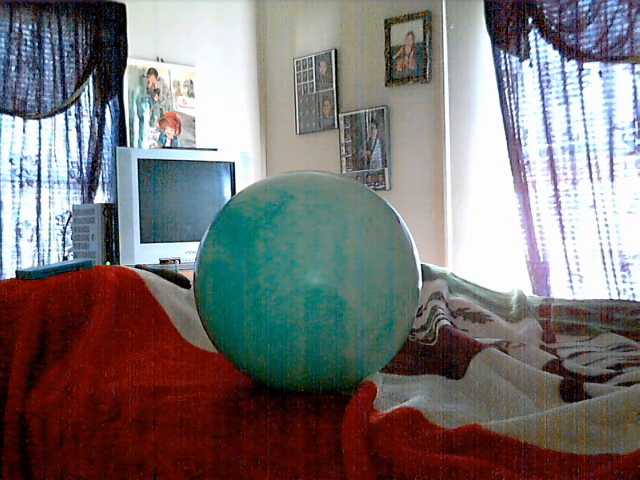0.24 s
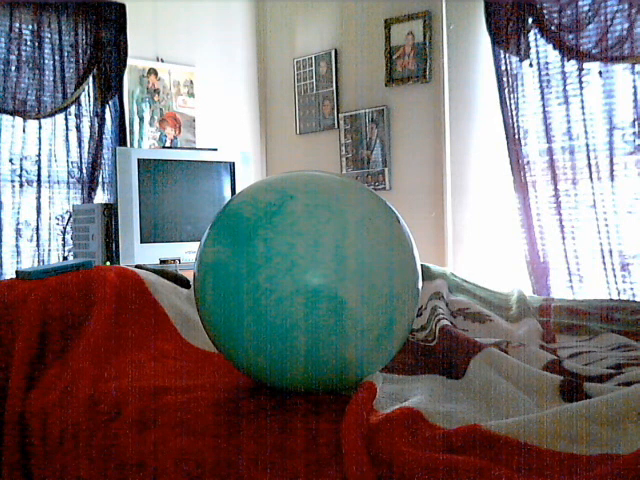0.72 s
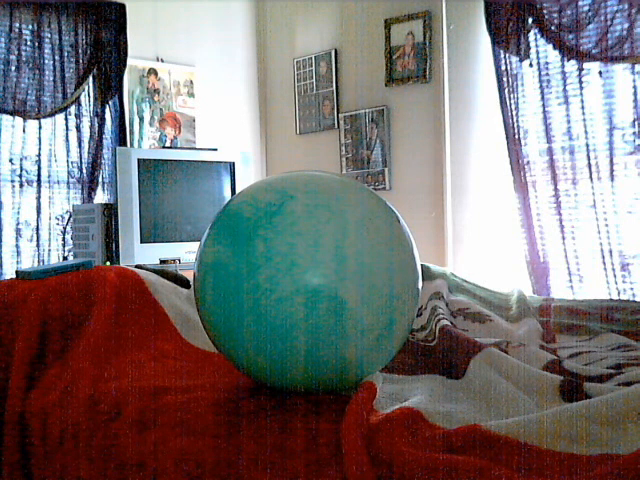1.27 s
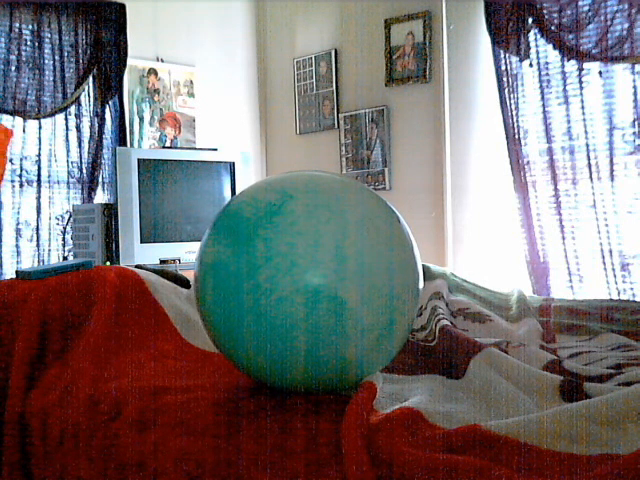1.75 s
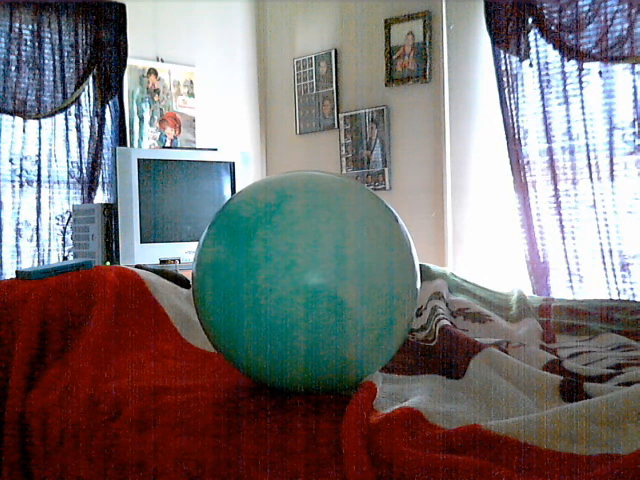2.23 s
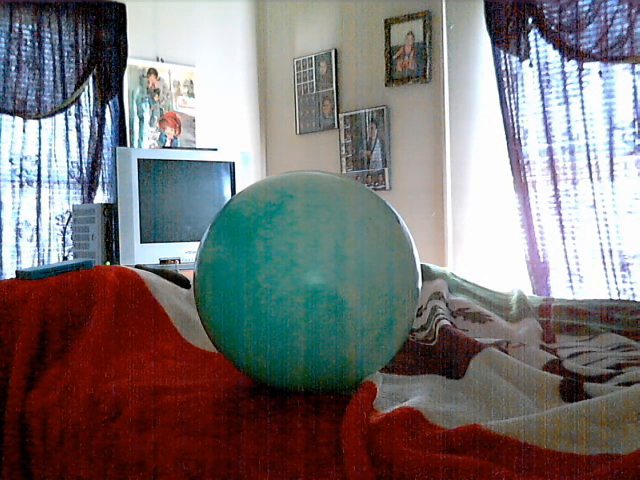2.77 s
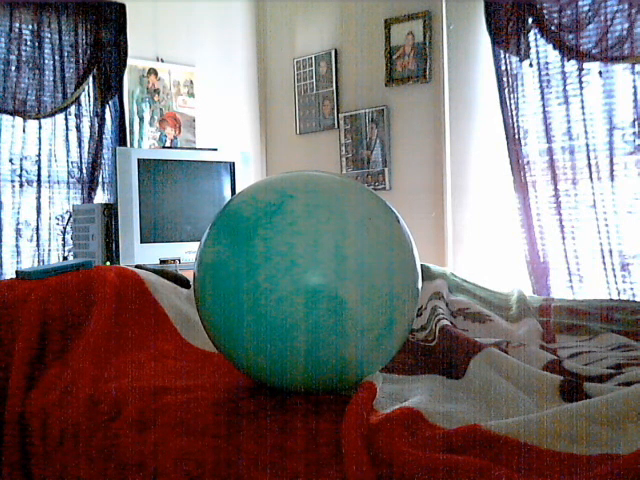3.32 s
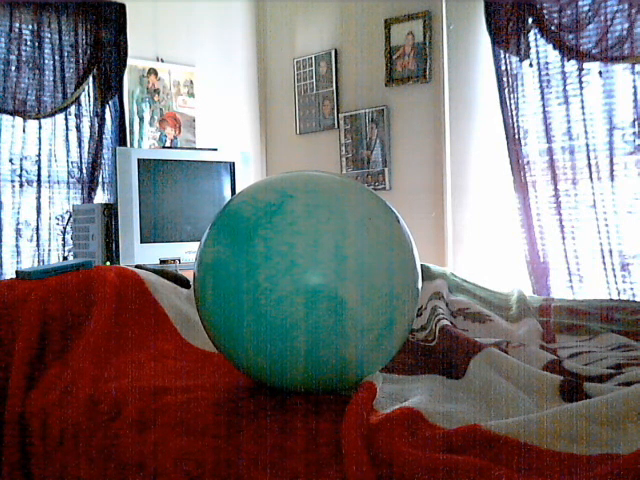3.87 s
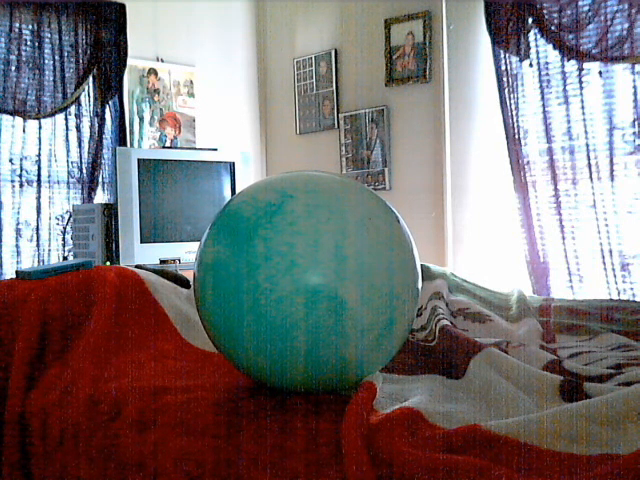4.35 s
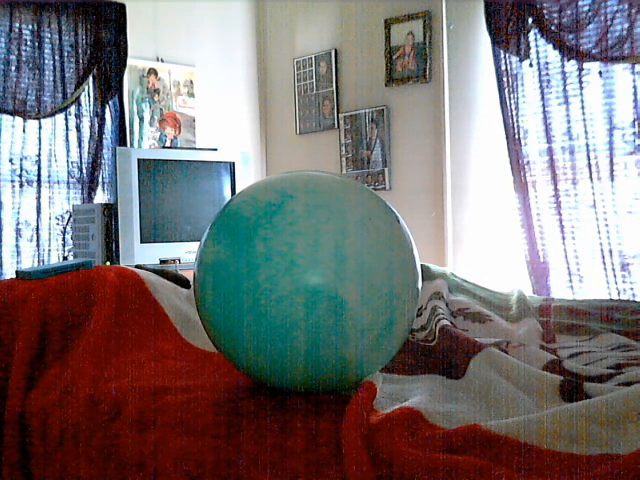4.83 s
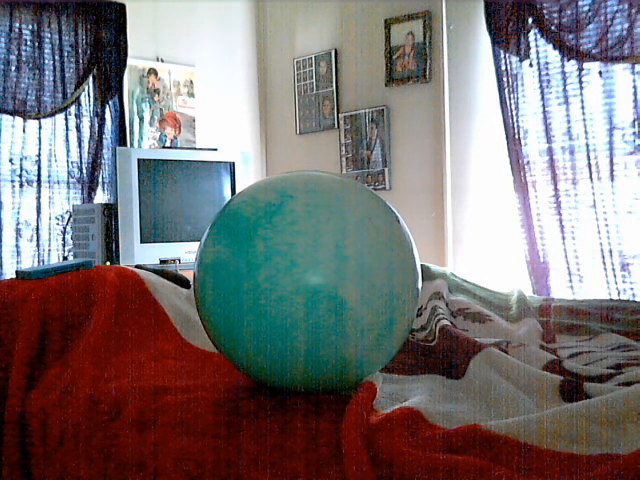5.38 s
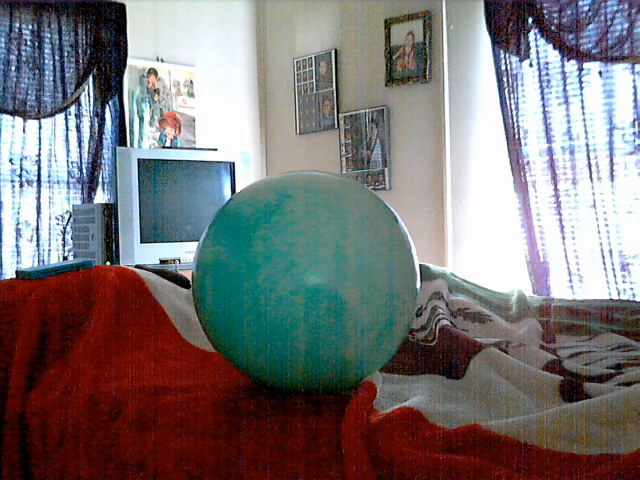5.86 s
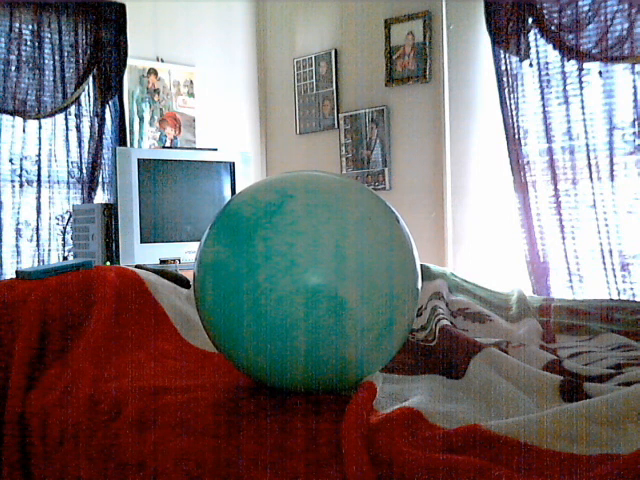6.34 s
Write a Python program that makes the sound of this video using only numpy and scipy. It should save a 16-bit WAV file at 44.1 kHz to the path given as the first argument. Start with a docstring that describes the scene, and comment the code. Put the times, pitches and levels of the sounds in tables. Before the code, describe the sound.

Close to a small microphone in a quiet bedroom, a toy blaster's slide rasps and clacks in its hollow plastic shell, ending on a hard catch. About a second later it fires with a sharp snap, a foam dart thumps a rubber ball, and the steel spring rings briefly. The priming and shot happen once more. Light handling taps and soft, dull thuds fall in between.

```python
"""A spring toy blaster is primed and fired twice in a bedroom, close to a small microphone.
Its slide rasps and clacks in the hollow plastic shell. At each shot the plunger slams, the steel
spring rings on, and the foam dart thumps a rubber ball. Light taps, dull thuds and a faint squeak
come in between. The microphone squashes loud hits and turns the quiet room noise down."""
import sys
import numpy as np
from scipy import signal
from scipy.fft import rfft, irfft, next_fast_len
from scipy.io import wavfile
from scipy.ndimage import uniform_filter1d, minimum_filter1d, map_coordinates

SR = 44100
rng = np.random.default_rng(int(sys.argv[2]) if len(sys.argv) > 2 else 0)


def dump(signal):
    """Clip the signal to [-1, 1] and save it as 16-bit WAV at the path in sys.argv[1]."""
    limited = np.clip(np.atleast_2d(signal).T, -1, 1)
    pcm = np.round(limited * 32767).astype(np.int16)
    wavfile.write(sys.argv[1], SR, pcm)


N = 291501

# The shell has five pitch bands, low to high: hollow, clack, edge, bright, sizzle. A knock or rub's
# level is that of its bright band; columns named for other bands are added to that level.
# Light taps of handling: t/s, level/dB, hollow/dB, clack/dB, edge/dB, note f/Hz
TAPS = [(0.076, -64.5, 25.5, 12, -9.5, 432), (.094, -52, 6, 5.5, -7, 482),
        (0.1199, -32.5, -14.5, -21, 1, 1515), (0.9127, -47.5, 14, 12, 4, 454),
        (1.0065, -57.5, -12.5, 10, 12.5, 919), (1.2398, -43.5, -18.5, -7.5, 4, 2682),
        (1.261, -38, -31.5, -6, 2, 3345), (1.3307, -32.5, -18.5, -4, 1, 2300),
        (1.3985, -46.5, 11.5, 11.5, 4, 459), (1.4194, -62.5, 20.5, 9, 16, 464.6),
        (1.6777, -66, 1, 27, 21, 1683), (2.1159, -33.5, 8, 0.5, -0.5, 1180),
        (2.6986, -68, -5, 9, 24.5, 3300), (3.2798, -59, 2.5, 8.5, 3.5, 829),
        (3.3121, -52, 3, -10, 8.5, 2520), (3.4234, -71, 3.5, 23, -2.5, 1002),
        (3.722, -44.5, 12, 5.5, 1.5, 432.2), (3.7624, -40, -4, -5, -11.5, 402.6),
        (3.8599, -61, 12.5, 7.5, 1, 418.7), (3.9805, -40.5, -8, 2, -6.5, 458.5),
        (4.7695, -63.5, 9, -1, 16, 511), (4.8933, -34, -22, -9, -19, 6360),
        (4.9279, -33, -24.5, -20.5, -3.5, 4423), (4.9783, -42.5, -28.5, -34, 1.5, 2307),
        (5.2585, -78.5, 24.5, 15.5, 1, 1553), (5.7548, -31, 8, 7.5, 6, 1832),
        (6.1475, -45, -12.5, 3, 10, 1723), (6.2994, -62.5, 11.5, -5.5, 6, 3634),
        (6.4525, -26.5, -4.5, -1, -1, 458)]
# Catches and stops of the slide: t/s, level/dB, hollow/dB, note f/Hz, level of the rasp after it/dB
SLIDE_CATCHES = [(.172, -16.5, -4.5, 1600, -25), (0.2013, -13.5, -6, 423.7, -29.5),
                 (0.27, -8.5, -20.5, 4228, -27), (0.3377, -11, -9.5, 6200, -30),
                 (.3721, -11.5, -18.5, 4490, -37), (0.482, -22.5, -16, 4420, -42),
                 (0.5179, -27.5, -13.5, 6100, -41.5), (0.5578, -30.5, -5.5, 484, -45.5),
                 (.5974, -16, -14.5, 1670, -24.5), (.6558, -21.5, -12.5, 1070, -34),
                 (0.6839, -9.5, -16.5, 6292, -26), (0.6949, -0.5, -13, 403.6, -27),
                 (3.9989, -29, -2, 497.5, -41.5), (4.0415, -16, -4.5, 431.6, -34.5),
                 (4.0776, -12.5, -8.5, 1623, -32.5), (4.1745, -8, -19, 5495, -28),
                 (4.2188, -8.5, -11, 2711, -29), (4.2448, -13, -22.5, 544.9, -35),
                 (4.3483, -25, -19, 3528, -41), (4.4065, -28, -10.5, 556.1, -49.5),
                 (4.4374, -16, -15, 1548, -25.5), (4.492, -20.5, -7.5, 424.8, -35.5),
                 (4.5091, -9.5, -17, 468.3, -34), (4.5206, -0.5, -10, 412.8, -31.5)]
# Plunger slams: t/s, spring level/dB, t/s at which the spring is damped
SHOTS = [(1.759, -37.5, 2.184), (5.438, -31.5, 5.94)]


def amp(db):
    """Turn decibels into a gain."""
    return 10 ** (np.asarray(db) / 20)


def curve_at(points, hz):
    """Read a curve of (f/Hz, value) points along a log frequency axis."""
    freqs, values = np.transpose(points)
    return np.interp(np.log(hz + 1), np.log(freqs + 1), values)


def wobble(rate):
    """A smooth random curve through `rate` points a second."""
    points = rng.standard_normal(int(N * rate / SR) + 4)
    return map_coordinates(points, [np.arange(N) * rate / SR])


def filtered(x, response):
    """Scale each frequency in x by response(hz)."""
    size = next_fast_len(N + SR // 2)
    return irfft(rfft(x, size) * response(np.fft.rfftfreq(size, 1 / SR)), size)[..., :N]


def resonate(x, peaks, low_hz, high_hz):
    """Pass x through resonances (f/Hz, width/Hz, level/dB); white noise keeps its power."""
    def response(f):
        gain = sum((-1) ** k * amp(db) * 1j * f * width / (hz * hz - f * f + 1j * f * width)
                   for k, (hz, width, db) in enumerate(peaks))
        gain *= (1j * f / (low_hz + 1j * f) * high_hz / (high_hz + 1j * f)) ** 2
        return gain / np.sqrt(np.mean(np.abs(gain) ** 2))
    return filtered(x, response)


def ring(modes, seconds, attack_s, scatter_db):
    """Fading tones (f/Hz, level/dB, t60/s); t60 is the time taken to fade by 60 dB."""
    t = np.arange(int(seconds * SR)) / SR
    tones = sum(amp(db + rng.normal(0, scatter_db) - 60 * t / t60) * np.sin(2 * np.pi * hz * t)
                for hz, db, t60 in modes)
    return tones * (1 - np.exp(-t / attack_s))


def add(track, start_s, sound):
    """Mix a sound into a track."""
    part = track[..., round(start_s * SR):][..., :sound.shape[-1]]
    part += sound[..., :part.shape[-1]]


def room_noise():
    """A quiet, steady hush whose bass wanders."""
    # Tone of the hush: f/Hz, relative level/dB
    spectrum = [(25, -23), (60, -7), (125, 0), (200, -0.5), (400, -6), (800, -12.5), (1600, -17),
                (3200, -25.5), (6300, -25.5), (8000, -34), (10500, -44), (16000, -50)]
    noise = filtered(rng.standard_normal(N), lambda hz: amp(curve_at(spectrum, hz)))
    noise /= np.sqrt(np.mean(noise ** 2))
    bass = filtered(noise, lambda hz: 1 / (1 + (hz / 350) ** 4))
    return amp(-66) * (noise - bass + bass * amp(1.9 * wobble(13)))


def rubs():
    """Friction on the shell: yields t/s, loudness shape, level/dB, hollow/dB, clack/dB, edge/dB."""
    # Strokes of slide and hand: start t/s, loudest t/s, end t/s, level/dB, hollow/dB, clack/dB
    strokes = [(0, 0.002, 0.049, -71.5, 13, 4.5), (.1, .168, 0.23, -47.5, 1.5, 2.5),
               (.4, .5, .62, -53, -1, -2), (.66, 0.711, .735, -17.5, -8, 0), (2.35, 2.548, 2.71, -77, 5, 2),
               (3.27, 3.343, 3.43, -62, -10.5, -4.5), (3.616, 3.709, 3.86, -58, -9.5, -9.5),
               (3.98, 4.071, 4.15, -34, 0, 0.5), (4.3, 4.41, 4.45, -46, -6, 0),
               (4.506, 4.533, 4.555, -15.5, -7.5, 1), (4.885, 4.909, 5.05, -57.5, -18, -7),
               (5.77, 5.88, 5.99, -62, -7.5, -19), (6.444, 6.445, 6.59, -56.5, 6, 3)]
    t = np.arange(SR // 4) / SR
    rasp = amp(-60 * t / .2215) * np.minimum(1, t / .0089)  # trails each catch of the slide
    for start, _, hollow_db, _, db in SLIDE_CATCHES:
        yield start, rasp, db, hollow_db + 6, 1.5, -1
    clatter = amp(-60 * t / .13) * np.minimum(1, t / .008)  # loose parts shake on after a tap
    for start, db, hollow_db, clack_db, edge_db, _ in TAPS:
        yield start, clatter, db - 14.5, hollow_db, clack_db, edge_db
    for start, loudest, end, db, hollow_db, clack_db in strokes:
        swell = np.interp(np.arange(start, end, 1 / SR), [start, loudest, end], [0, np.pi / 2, 0])
        yield start, np.sin(swell) ** 1.8, db, hollow_db, clack_db, clack_db - 2.5


def sizzle_db(db):
    """Quiet knocks and rubs sound duller; loud ones keep their top treble."""
    return -15 + .22 * (db + 15)


def knocks():
    """Slide, plunger and taps hit the shell: yields t/s, level/dB, bands/dB, f/Hz, note/dB, t60/s."""
    # The plunger's release, slam and rebound: t/s from the slam, level/dB, hollow/dB, note f/Hz
    plunger = [(-.0058, -10, -4, 5702), (0, 0.5, -6, 425.7), (0.0142, -5, 4, 385)]
    slide_clack_db, plunger_clack_db = 2.5, 6  # the plunger cracks harder
    hits = [(*catch[:4], slide_clack_db) for catch in SLIDE_CATCHES]
    hits += [(slam + delay, *rest, plunger_clack_db) for slam, _, _ in SHOTS for delay, *rest in plunger]
    for start, db, hollow_db, hz, clack_db in hits:
        yield start, db, [hollow_db, clack_db + .45 * hollow_db, -4, 0, sizzle_db(db)], hz, -9, .03157
    for start, db, hollow_db, clack_db, edge_db, hz in TAPS:
        yield start, db, [hollow_db, clack_db, edge_db, 0, sizzle_db(db) - 19], hz, -4, .032


def shell():
    """Knocks and rubs shake the plastic shell; each knock also sounds the note of the part it hits."""
    # The shell's resonances, band by band: f/Hz, width/Hz, level/dB
    hollow = [(200, 130, -20.5), (302, 27, -15), (403.2, 61, 1), (504.2, 140, -1.5)]
    clack = [(633.3, 190, -4.5), (805.6, 410, 1), (1238.8, 990, -1), (1573, 540, -0.5)]
    edge = [(1956, 140, -4.3), (2479, 370, -0.82), (2771, 220, 1), (3450, 440, -1.6)]
    bright = [(4315, 640, 1.5), (5448, 380, 3.5), (5996, 490, 4.5), (6951, 1000, -0.5)]
    sizzle = [(7520, 1300, 2.5), (10540, 3000, -7.5)]
    bands = [(hollow, 190, 890), (clack, 400, 8700), (edge, 1100, 5700),
             (bright, 2400, 7200), (sizzle, 5000, 8100)]  # resonances, low f/Hz, high f/Hz
    forces, notes = np.zeros((5, N)), np.zeros(N)
    t = np.arange(SR // 12) / SR
    for start, db, colour_db, hz, note_db, t60 in knocks():
        attack_s = .0019 * max(1, -db / 24)  # soft contacts start more gently
        shape = amp(-60 * t / t60) * (1 - np.exp(-t / attack_s))
        bands_db = db + np.array(colour_db)
        add(forces, start, amp(bands_db)[:, None] * shape * rng.standard_normal((5, len(t))))
        note_t60 = .02 + 18 / hz  # high notes die sooner
        pair = [(hz, 0, note_t60), (hz * 1.06, -3, .47 * note_t60)]
        add(notes, start, amp(bands_db.max() + note_db) * ring(pair, .2, attack_s=.0016, scatter_db=2.5))
    grit = amp(1.2 * wobble(150) + 1.8 * wobble(30))  # friction catches and slips
    for start, shape, db, *colour_db in rubs():
        bands_db = db + np.array([*colour_db, 0, sizzle_db(db + 4.5)])
        samples = round(start * SR) + np.arange(len(shape))
        rub = amp(bands_db)[:, None] * shape * grit.take(samples, mode="clip")
        add(forces, start, rub * rng.standard_normal(rub.shape))
    return notes + sum(resonate(force, *band) for force, band in zip(forces, bands))


def low_swells():
    """Brief low swells of room rumble and a few soft, dull thuds."""
    # Swells and thuds: t/s, level/dB, f/Hz
    swells = [(1.641, -56, 156), (2.599, -57.5, 289.7), (2.897, -48.5, 189.7), (2.926, -49.5, 188.1),
              (2.956, -51, 188.3), (3.104, -52, 144.6), (3.357, -53, 127.6), (3.585, -50.5, 137),
              (3.791, -50.5, 139.3), (4.708, -53, 164.8), (5.225, -56.5, 140), (5.826, -37, 188.2),
              (5.898, -47, 193), (6.01, -42.5, 132.4), (6.064, -49.5, 146.7), (6.109, -47, 122),
              (6.168, -55, 176), (6.243, -52, 135), (6.408, -49.5, 148), (6.548, -42.5, 143.3)]
    out = np.zeros(N)
    for start, db, hz in swells:
        modes = [(hz, 0, .07), (hz * 2, -9, .06), (hz * .51, -9, .07)]
        add(out, start, amp(db + 6) * ring(modes, .2, attack_s=.0055, scatter_db=2.5))
    return out


def spring():
    """The steel spring sings after each slam until it is damped; its many coils add a weaker shimmer."""
    # The spring's main tones: f/Hz, level/dB, t60/s
    steel_tones = [(2143, -6, .25), (2590, -9.5, .25), (3100, -15, 0.67), (3253, -7, 1.1),
                   (3350.8, -8.5, 0.34), (3480, -12.5, .7), (3480, -14.5, .4), (3650, -17.5, 0.71),
                   (3970, -16.5, .8), (4525, -8.5, 0.9), (4780, -13.5, .7), (4930, -11.5, .6),
                   (5028, -15.5, .7), (5230, -16.5, .8), (5437, -16.5, .8), (5580, -12.5, 1),
                   (5700, -8.5, 0.51), (5933, -6, .6), (6107, -8.5, .6), (6460, -13.5, .6),
                   (6260, -10, 0.46), (6600, -13, 0.5), (6864, -16.5, .55), (7075, -18, .6),
                   (7175, -18.5, 0.65), (7542, -24, .5)]
    out = np.zeros(N)
    shimmer = [(3000 + 5200 * pitch, -13 - 70 * (pitch - .5) ** 2, .48 + .35 * length)
               for pitch, length in rng.uniform(size=(70, 2))]
    for start, db, damped_at in SHOTS:
        song = ring(steel_tones + shimmer, 1, attack_s=.004, scatter_db=.5)
        since_damped = np.maximum(np.arange(len(song)) / SR + start - damped_at, 0)
        add(out, start, amp(db - 56 * since_damped) * song)
    return out * amp(3.2 * wobble(76))  # the coils buzz against their guide


def ball():
    """The foam dart hits the rubber ball, whose air and skin boom."""
    # Hits on the ball: t/s, level/dB, boost of the deep tones/dB
    thumps = [(1.784, 2, -0.5), (5.467, -0.5, 1.5), (2.113, -33.5, 17)]
    # The ball's tones: f/Hz, level/dB, t60/s
    ball_tones = [(157, -15, 0.19), (232.9, -9, 0.12), (376.2, -2, .11), (466.8, 0, 0.06),
                  (653.5, -8.5, 0.066)]
    out = np.zeros(N)
    for start, db, deep_db in thumps:
        modes = [(hz, level + deep_db * (hz < 300), t60) for hz, level, t60 in ball_tones]
        add(out, start, amp(db) * ring(modes, .5, attack_s=.0015, scatter_db=0))
    return out * amp(.68 * wobble(60))  # the ball rocks on the bedding


def squeak():
    """A faint rub with a pitch: a narrow band of noise swells and fades."""
    # The rub: start t/s, end t/s, f/Hz, width/Hz, level/dB
    pitched_rub = (2.375, 2.52, 2480, 170, -66)
    start, end, hz, width_hz, db = pitched_rub
    t = np.arange(N) / SR
    shape = np.clip(np.minimum(t - start, end - t) / .014, 0, 1)
    friction = shape * amp(1.3 * wobble(40.1)) * rng.standard_normal(N)
    return amp(db) * resonate(friction, [(hz, width_hz, 0)], low_hz=1500, high_hz=3500)


def room_echo(x, piece_s=.2):
    """Walls and furniture answer; the blaster moves, so each short piece of sound gets a new echo."""
    # How long the echo lasts: f/Hz, t60/s
    fade_times = [(150, 0.36), (700, 0.3), (5000, 0.28), (8500, 0.29), (12000, 0.14)]
    out, step = np.zeros(N), int(piece_s * SR)
    for first in range(0, N, step):
        hz, t, noise = signal.stft(rng.standard_normal(SR // 2), SR, nperseg=256)
        fade = amp(-60 * t / curve_at(fade_times, hz)[:, None])
        _, tail = signal.istft(noise * fade, SR, nperseg=256)
        add(out, first / SR + .003, signal.fftconvolve(x[first:first + step], tail / np.linalg.norm(tail)))
    return out


def scene():
    """The blaster, ball and low swells with their echo and the room's hush, in one channel."""
    blaster = shell() + spring() + squeak()
    boom, swells = ball(), low_swells()
    echo = room_echo(amp(-6.5) * blaster + amp(-7) * boom + amp(-10) * swells)
    return (blaster + boom + swells + echo + room_noise())[None]


def noise_gate(x, gate_db, depth_db, knee_db):
    """Turn quiet stretches down; the gate opens quickly for a loud sound and stays open briefly."""
    level_db = 10 * np.log10(np.abs(uniform_filter1d(x ** 2, size=441)) + 1e-12)
    held_db = -minimum_filter1d(-level_db, size=661, origin=220)
    shut = 1 / (1 + np.exp((held_db - gate_db) / knee_db))
    return x * amp(-depth_db * uniform_filter1d(shut, size=441))


def record(dry):
    """Peaks are squashed, quiet stretches turned down, the deepest bass and highest treble cut away."""
    ceiling, hardness = .68, 6.5
    squashed = dry[0] / (1 + np.abs(dry[0] / ceiling) ** hardness) ** (1 / hardness)
    bass = filtered(squashed, lambda hz: 1 / (1 + (hz / 320) ** 6))
    gated = noise_gate(bass, gate_db=-64, depth_db=5.5, knee_db=1.5)
    gated += noise_gate(squashed - bass, gate_db=-58.5, depth_db=6.5, knee_db=3.5)

    def response(hz):
        dull_top = amp(-20 / (1 + np.exp((12800 - hz) / 80))) * (hz < 16300)
        bass_cut = hz ** 3 / (85 ** 3 + hz ** 3)
        return dull_top * bass_cut
    return filtered(gated, response)[None]


dry = scene()
out = record(dry)
dump(out)
```